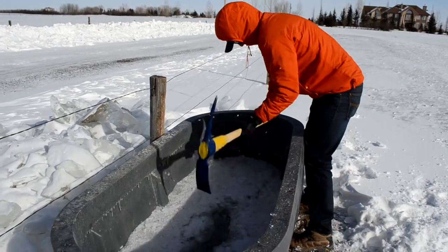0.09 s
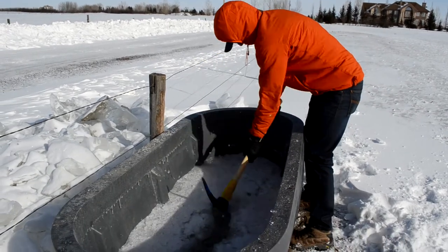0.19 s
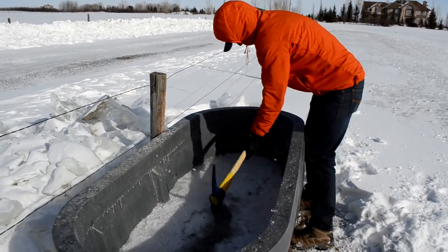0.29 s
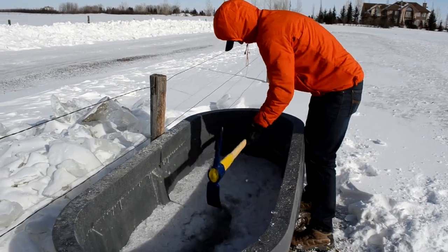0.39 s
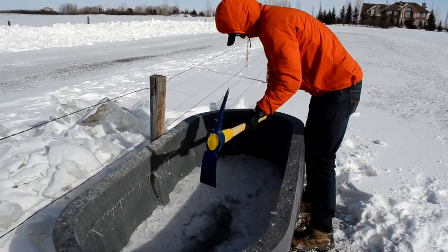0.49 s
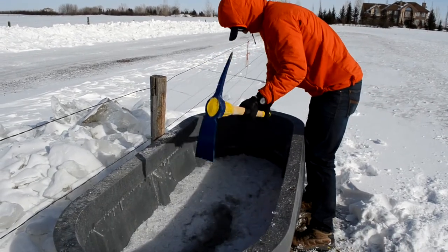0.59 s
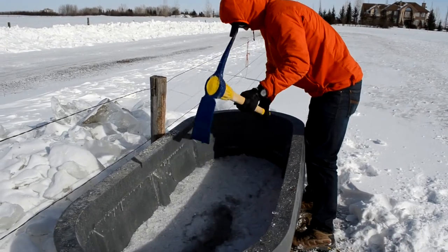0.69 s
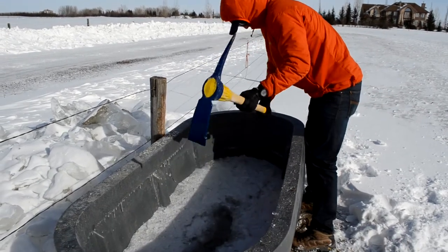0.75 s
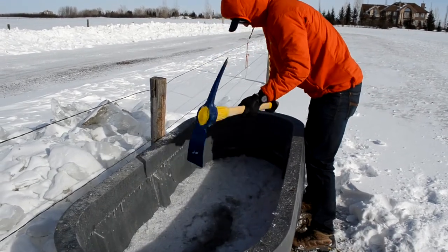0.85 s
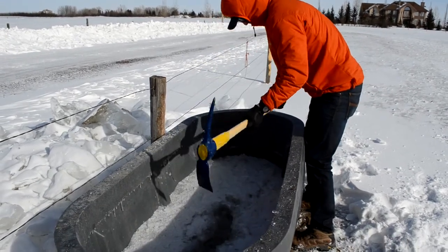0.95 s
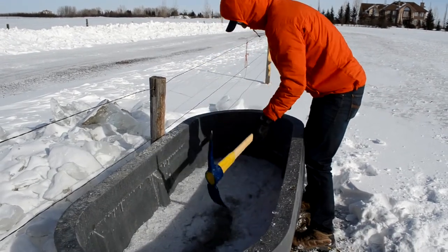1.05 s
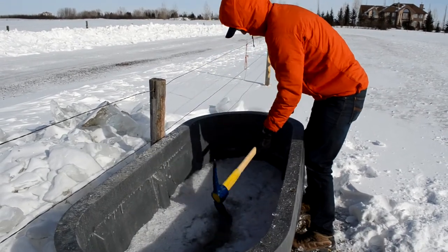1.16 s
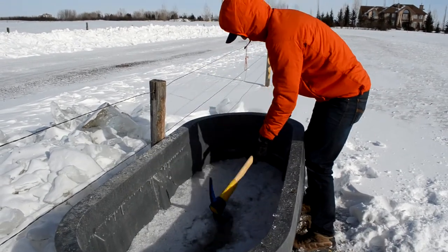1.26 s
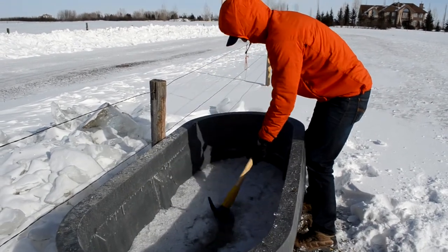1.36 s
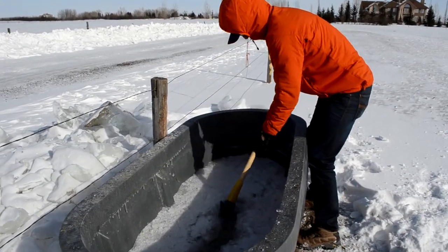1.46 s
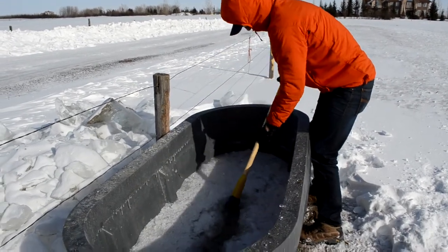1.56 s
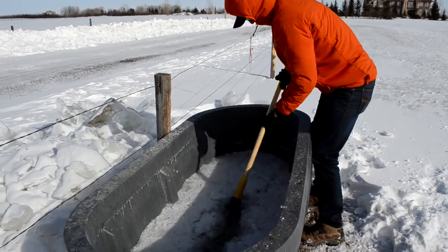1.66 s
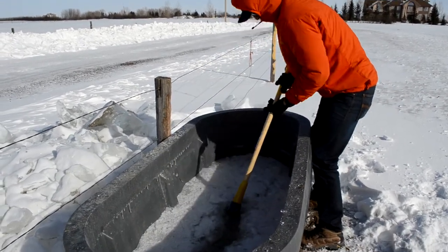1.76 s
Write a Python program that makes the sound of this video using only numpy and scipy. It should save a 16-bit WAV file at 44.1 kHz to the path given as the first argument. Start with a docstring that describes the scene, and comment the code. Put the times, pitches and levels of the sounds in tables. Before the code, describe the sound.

A pickaxe cracks twice into thick ice in a plastic trough, with crunching chunks and low wind.

```python
"""A low wind rumble over a dully rumbling trough is heard first; then a pickaxe bites twice into thick ice.
The first blow breaks through in two stages; each stage is a noise burst of dense random micro-cracks
that comes with decaying sine modes of the ice slab, the steel head and the plastic trough.
Loose chunks knock and snap as further crack bursts; grinding ice, pattering chips and a rustling jacket
are streams of random grains. The wind is filtered noise with slow gusts."""
import sys
import numpy as np
from scipy import signal
from scipy.fft import rfft, irfft
from scipy.io import wavfile
from scipy.ndimage import uniform_filter1d

SR = 44100
rng = np.random.default_rng(int(sys.argv[2]) if len(sys.argv) > 2 else 0)


def transcribe(signal):
    """Save signal, clipped to [-1, 1], as a 16-bit WAV file at the path in sys.argv[1]."""
    frames = np.atleast_2d(signal).T
    limited = np.clip(frames, -1, 1)
    pcm = np.round(limited * 32767).astype(np.int16)
    wavfile.write(sys.argv[1], SR, pcm)


N = 79380
SIZE = 16384  # samples in one short sound
AGE, TIME = np.arange(SIZE) / SR, np.arange(N) / SR  # s, from the onset of a short sound / of the scene
# tail of knocks (snaps share its level): level/dB, decay time/s
KNOCK_TAIL_DB, KNOCK_TAIL_T60_S = -23.5, 0.19


def undb(db):
    """Level to amplitude: 20 dB is a factor of ten."""
    return 10 ** (np.asarray(db) / 20)


def curve(rows):
    """Amplitude envelope, linear in level between the points (t/s, level/dB)."""
    return undb(np.interp(TIME, *np.array(rows).T))


def octaves(size):
    """Logarithmic frequency axis: each spectral bin in octaves above 1 Hz."""
    return np.log2(np.maximum(np.fft.rfftfreq(size, 1 / SR), 1))


def spectrum(rows, size=SIZE):
    """Spectral level at each bin, linear in octaves between the points (f/Hz, level/dB)."""
    hz, db = np.array(rows).T
    return np.interp(octaves(size), np.log2(hz), db)


def bump(hz, width, size=SIZE):
    """Resonance peak of height 1, Gaussian in log frequency; width is its standard deviation in octaves."""
    return np.exp(-.5 * ((octaves(size) - np.log2(hz)) / width) ** 2)


def shelf():
    """Shelving response that rises from 0 in the bass to 1 in the treble."""
    midpoint_hz = 2380
    return .5 + .5 * np.tanh(octaves(SIZE) - np.log2(midpoint_hz))


def colour(x, db):
    """Minimum-phase filter: folding the cepstrum makes the response db (level/dB per bin) causal."""
    cepstrum = irfft(db * np.log(10) / 20)
    half = len(x) // 2
    cepstrum[1:half] *= 2
    cepstrum[half + 1:] = 0
    return irfft(rfft(x) * np.exp(rfft(cepstrum)))


def fade(t60):
    """Exponential decay of a damped vibration, down 60 dB after t60 seconds."""
    return np.exp(-np.log(1000) * AGE / t60)


def delayed(envelope, delay):
    """Sustained excitation: the envelope holds its first value for delay seconds, then runs."""
    return np.interp(AGE - delay, AGE, envelope)


def strength(x, db):
    """Energy normalisation: a short sound gets the energy of an rms level db held for 0.03 s."""
    return x * undb(db) / np.sqrt(np.sum(x ** 2) / (.03 * SR))


def add(out, s, x):
    """Linear superposition: mixes x into out from time s."""
    i = int(s * SR)
    out[i:i + len(x)] += x[:N - i]


def fractures(rise, t60, tail_db, tail_t60, db, damp_hz=3500):
    """Brittle fracture as shot noise: a swelling, dying burst of micro-cracks with a duller tail."""
    cracks_per_s = 7000
    cracks = rng.standard_normal(SIZE) * (rng.random(SIZE) < cracks_per_s / SR)
    dull_cracks = signal.lfilter(*signal.butter(2, damp_hz, fs=SR), cracks)
    # the bright cracks die sooner than the damped ones
    early = delayed(fade(t60 * 0.76), rise)
    late = delayed(fade(t60) + undb(tail_db) * fade(tail_t60), rise) - early
    swell = np.minimum(AGE / rise, 1) ** 2
    burst = (cracks * early + dull_cracks * late) * swell
    # flatten the smoothed power spectrum, so that db alone sets the colour
    power = uniform_filter1d(np.abs(rfft(burst)) ** 2, size=90)
    return colour(burst, db - 10 * np.log10(power + 1e-12))


def ring(modes, rise, bite, pitch=1):
    """Modal vibration: damped sines build up, hold while the pick bites, then decay freely."""
    total = np.zeros(SIZE)
    for hz, db, t60 in modes:
        phase = 2 * np.pi * hz * pitch * (AGE - rise) + rng.normal(0, 0.44)
        total += undb(db) * delayed(fade(t60), rise + bite) * np.sin(phase)
    return total * np.minimum(AGE / rise, 1)


def stream(rows, x):
    """Spectral shaping of a continuous sound, normalised to rms 1."""
    y = colour(x, spectrum(rows, size=N))
    return y / y.std()


def grains(rate, spread_db, t60):
    """Granular noise: random ticks (rate per second) of uneven size add their decaying powers."""
    size = undb(spread_db * np.minimum(rng.exponential(size=N), 4))
    ticks = rng.random(N) < rate / SR
    power = signal.fftconvolve(size ** 2 * ticks, fade(t60) ** 2)[:N]
    return np.sqrt(np.abs(power)) * rng.standard_normal(N)


def wind():
    """Broadband flow noise: low buffeting over faint open-air hiss, modulated by random gusts."""
    # colour of wind and open air: f/Hz, relative spectral level/dB
    air_colour = [(20, -13), (45, -4.5), (90, 3.5), (130, 0.5), (190, -7.5), (280, -15.5), (400, -21),
                  (650, -23), (1000, -32), (1600, -32.5), (3000, -50), (7000, -72), (15000, -69)]
    # slow course of the wind: t/s, gain/dB
    wind_course = [(0, -5), (.2, -2), (.34, -4), (.46, 6.5), (.58, -2), (.68, -1.5), (.8, -2.5), (1.0, 2.5),
                   (1.15, 0.5), (1.4, 2), (1.58, 4.5), (1.8, -2)]
    air_db, gust_db = -35, 0.7  # rms level before the slow course; standard deviation of the gust points
    gust = np.interp(TIME, np.arange(0, 2, .05), rng.standard_normal(40))
    air = stream(air_colour, rng.standard_normal(N))
    return air * undb(air_db + gust_db * gust) * curve(wind_course)


def jacket():
    """Friction noise: the fine rustle of nylon as the body straightens, a dense stream of tiny grains."""
    # rustle course: t/s, level/dB
    rustle_course = [(0, -76), (1.1, -63), (1.4, -54), (1.62, -55), (1.75, -49), (1.8, -52)]
    # rustle colour: f/Hz, relative spectral level/dB
    rustle_colour = [(400, -9), (1500, 8.5), (3500, 3), (5000, -6), (7000, -10), (10000, -20.5),
                     (15000, -42)]
    return stream(rustle_colour, grains(6000, 3.7, 0.011)) * curve(rustle_course)


def trough():
    """Low-frequency granular excitation: the plastic tub rumbles dully as ice and pick shift in it."""
    # rumble course: t/s, level/dB
    rumble_course = [(0, -60), (.1, -50.5), (.15, -34.5), (.19, -54), (.28, -32), (.39, -48), (.45, -60),
                     (.48, -43), (.55, -53), (.76, -49), (.84, -34.5), (.92, -48), (1.0, -43.5), (1.2, -43),
                     (1.44, -45), (1.52, -30.5), (1.68, -42.5), (1.8, -35)]
    # rumble colour: f/Hz, relative spectral level/dB
    rumble_colour = [(60, -13), (130, -11), (185, 6), (280, -3), (340, -2.5), (450, -13), (800, -30.5),
                     (3000, -74)]
    return stream(rumble_colour, grains(1400, 1.74, 0.025)) * curve(rumble_course)


def chips():
    """Random impacts: small chips rain back as briefly decaying grains."""
    # patter course: t/s, level/dB before the body resonances
    patter_course = [(0, -58), (.05, -51.5), (.19, -54.5), (.29, -49.5), (.35, -36.5), (.43, -43.5),
                     (.455, -55), (.53, -51), (.61, -53), (.70, -59.5), (.83, -67.5), (1.8, -74)]
    # patter colour: f/Hz, relative spectral level/dB
    patter_colour = [(300, 7), (900, 9.5), (1700, 13), (3000, 8.5), (4800, -3), (7200, -1), (10000, -10.5),
                     (13500, -19), (16000, -25.5)]
    return stream(patter_colour, grains(450, 4, 0.036)) * curve(patter_course)


def grind():
    """Frictional crushing: ice grinds as the pick is levered out, a stream of uneven grains."""
    # grinding course: t/s, level/dB before the body resonances
    grind_course = [(.25, -50.5), (.31, -39.5), (.375, -26.5), (.445, -55.5), (.49, -40.5), (.56, -49.5),
                    (.75, -52.5), (1.21, -64), (1.25, -35.5), (1.33, -43.5), (1.385, -50.5), (1.45, -40),
                    (1.49, -38.5), (1.54, -40), (1.60, -40.5), (1.66, -47), (1.8, -57)]
    # grinding colour: f/Hz, relative spectral level/dB
    grind_colour = [(100, -41.5), (270, 13.5), (430, 4.5), (800, 8.5), (1500, 8), (2000, 2.5), (2700, -3.5),
                    (4500, -31), (8000, -53.5), (15000, -33)]
    return stream(grind_colour, grains(1600, 6, 0.017)) * curve(grind_course)


def snaps():
    """Brittle fracture of thin edges: each snap is a crack burst in a band about its pitch."""
    # snaps and ticks: t/s, pitch f/Hz, skirt width/octaves, t60/s, level/dB before the body resonances
    snap_events = [(0.0295, 4500, 0.76, 0.048, -63.5), (0.0700, 5000, 1.3, 0.015, -64.5),
                   (0.1335, 4200, 0.77, 0.034, -62.5), (0.3315, 5600, 1.2, 0.041, -58),
                   (0.3506, 3130, 0.1, .05, -37), (0.4095, 5500, 1.1, .03, -66),
                   (0.5550, 5930, 0.52, 0.035, -59), (0.5885, 6370, 0.41, 0.066, -61),
                   (0.6946, 5500, 1.2, .03, -73), (1.3030, 2244, .15, 0.031, -35),
                   (1.433, 3520, 0.48, 0.012, -44.5)]
    skirt_db = 13.5
    out = np.zeros(N)
    for s, hz, width, t60, db in snap_events:
        distance = (octaves(SIZE) - np.log2(hz)) / width
        tone = -skirt_db * np.log10(1 + distance ** 4)
        add(out, s, strength(fractures(0.00079, t60, KNOCK_TAIL_DB, t60, tone), db))
    return out


def knocks():
    """Impact of loose pieces on the pick and each other: crack bursts peaked at each piece's resonance."""
    # knocks: t/s, build-up/s, t60/s, level/dB before the body resonances,
    # resonance f/Hz, treble shelf level/dB, start of treble loss f/Hz
    knock_events = [(0.1723, 0.00062, 0.013, -43, 1650, 13, 12200),
                    (0.2236, 0.0018, 0.082, -20, 1490, -13, 9000),
                    (0.2879, .001, 0.034, -38, 1690, -6, 10900),
                    (0.35, 0.00038, 0.033, -28, 1430, 3, 14000),
                    (0.3852, 0.0018, 0.015, -35.5, 704, -5, 14000),
                    (0.462, 0.0049, 0.061, -25.5, 1205, 3.5, 10900),
                    (0.7815, 0.00073, 0.033, -44.5, 590, -6.5, 12000),
                    (0.9389, 0.0019, 0.019, -39, 600, -21, 6000),
                    (1.078, 0.0015, 0.016, -40.5, 805, -17, 7900),
                    (1.0985, .001, 0.019, -47, 700, -13, 7000),
                    (1.1760, 0.00072, 0.012, -35.5, 875, -15, 4540),
                    (1.1860, 0.00067, 0.0316, -42, 1980, 15, 6100),
                    (1.3033, 0.0009, 0.067, -31, 1100, 1, 3440),
                    (1.3763, .001, 0.014, -49.5, 1540, 9, 10900),
                    (1.4078, 0.0011, 0.11, -39.5, 1400, 11, 3800),
                    (1.4440, 0.0045, .07, -35, 1530, 8, 4000),
                    (1.4639, 0.0026, 0.076, -22.5, 820, -3.5, 10200),
                    (1.4970, 0.0042, 0.047, -28, 1390, -11.5, 10000),
                    (1.51, 0.0045, 0.037, -29, 1470, -13, 5900),
                    (1.6180, 0.0034, 0.032, -39.5, 1440, -7, 6000), (1.729, 0.0013, .03, -46, 650, 1, 7900)]
    # chunk colour: f/Hz, relative spectral level/dB
    chunk_colour = [(80, -9.5), (260, 6), (420, -3), (700, 0), (1400, -0.5), (1900, -3.5), (2700, -6),
                    (4500, -20.5), (7500, -27.5), (11000, -39), (15000, -62)]
    peak_db, peak_width_oct, loss_db_per_oct = 11, 0.18, 26
    out = np.zeros(N)
    for s, rise, t60, db, hz, treble_db, dull_hz in knock_events:
        tone = spectrum(chunk_colour) + treble_db * shelf()
        tone += peak_db * bump(hz, peak_width_oct)
        tone -= loss_db_per_oct * np.maximum(octaves(SIZE) - np.log2(dull_hz), 0)
        add(out, s, strength(fractures(rise, t60, KNOCK_TAIL_DB, KNOCK_TAIL_T60_S, tone), db))
    return out


def blows():
    """Impulsive excitation and reflection: cracks ring slab, steel and trough, and the wall echoes them."""
    # stages of the blows: t/s, build-up/s, bite/s, crack t60/s, crack level/dB, treble shelf level/dB,
    # ice pitch f/Hz, ice level/dB, steel level/dB, trough level/dB (all before the body resonances)
    blow_events = [(0.2002, .0050, 0.002, .07, -15.5, 0.5, 1373, -16.5, -26.5, -25.5),
                   (0.2348, 0.00163, 0.0019, 0.027, -16, -2.5, 1192, -18, -34, -19.5),
                   (1.1971, .0064, 0.0032, 0.087, -20.5, 6.5, 1200, -12.5, -31.5, -30.5)]
    # fracture colour: f/Hz, relative spectral level/dB
    fracture_colour = [(60, -31.5), (160, 0), (290, 5), (420, -16.5), (580, 2.5), (850, -1), (1300, 2.5),
                       (1700, -1), (2150, -6.5), (3000, -7.5), (4500, -21.5), (7000, -28), (10000, -39),
                       (15000, -56)]
    # ice slab modes: multiple of the ice pitch, relative level/dB, t60/s
    ice_modes = [(.85, -12, .04), (1, -1, 0.039), (1.12, -7, 0.057), (1.39, -11, 0.02)]
    # pick head modes: f/Hz, relative level/dB, t60/s
    steel_modes = [(2574, 5.5, 0.053), (3430, -4.5, .05), (5390, -11, 0.036), (7160, -16, 0.053),
                   (9270, -11, 0.0083)]
    # trough modes: f/Hz, relative level/dB, t60/s
    trough_modes = [(158, -7.5, 0.055), (221, -8.5, 0.13), (246, -4.5, 0.12), (289, 1, 0.088),
                    (521.4, -6.5, 0.094), (643, -2.5, 0.092)]
    tail_db, tail_t60_s = -27, 0.24
    echo_s, echo_db = .0049, -15.5
    out = np.zeros(N)
    for s, rise, bite, t60, db, treble_db, hz, ice_db, steel_db, trough_db in blow_events:
        tone = spectrum(fracture_colour) + treble_db * shelf()
        crack = strength(fractures(rise, t60, tail_db, tail_t60_s, tone, damp_hz=2500), db)
        ice = strength(ring(ice_modes, rise, bite, hz), ice_db)
        steel = strength(ring(steel_modes, rise, bite), steel_db)
        tub = strength(ring(trough_modes, rise, bite), trough_db)
        add(out, s, crack + ice + steel)
        # the trough starts ringing together with its wall echo
        add(out, s + echo_s, undb(echo_db) * crack + tub)
    return out


def body(x):
    """Resonant filtering: ice and trough lend their narrow resonances to whatever sounds inside."""
    # resonances of the ice-filled trough: f/Hz, width/octaves, gain/dB
    body_modes = [(499, 0.042, 4.5), (649, 0.023, 1.5), (729, 0.022, 4.5), (783, 0.024, -0.5),
                  (831, 0.017, 5.5), (1021, 0.0083, 2), (1150, 0.012, 0), (1401, 0.022, 4),
                  (1527, 0.023, 2), (1607, 0.03, 1.5), (1884, 0.0067, -1.5), (2230, 0.02, -1.5),
                  (2512, 0.0083, 0), (2980, 0.052, -3), (3340, 0.028, 3), (4380, 0.12, 2.5),
                  (5200, 0.033, -2), (5290, 0.01, 4), (6860, 0.054, 3)]
    gain_db = -1 + sum(db * bump(hz, width, size=N) for hz, width, db in body_modes)
    return colour(x, gain_db)


def scene():
    """Superposition of all sources at one microphone, as a single channel."""
    inside = body(chips() + grind() + snaps() + knocks() + blows())
    return (wind() + jacket() + trough() + inside)[None]


def record(dry):
    """Saturation and band limiting: the recorder rounds the loudest peaks and cuts the top."""
    soft = dry / (1 + dry ** 6) ** (1 / 6)
    # elliptic low-pass: order 8, ripple 0.2 dB, stopband -80 dB, edge 15500 Hz
    low_pass = signal.ellip(8, .2, 80, 15500, fs=SR, output="sos")
    return signal.sosfilt(low_pass, soft)


dry = scene()
out = record(dry)
transcribe(out)
```